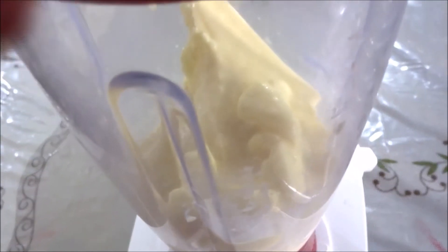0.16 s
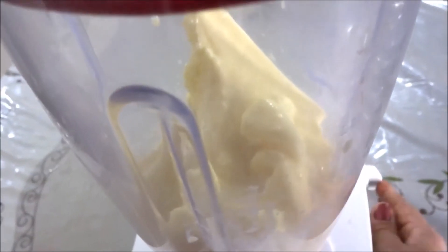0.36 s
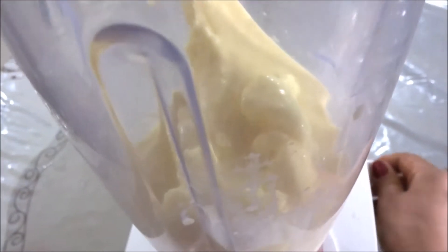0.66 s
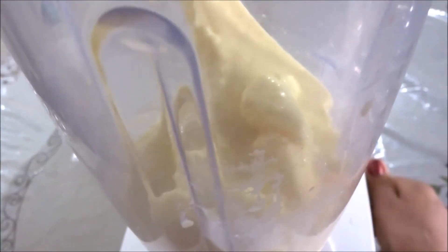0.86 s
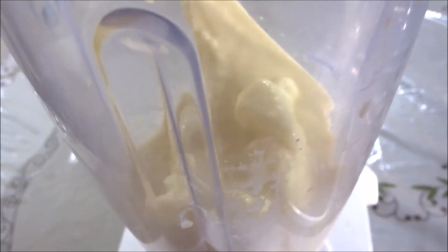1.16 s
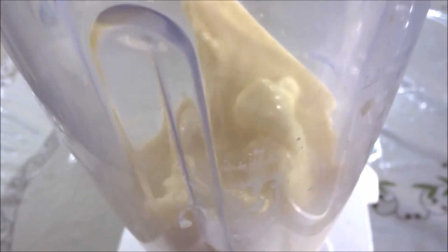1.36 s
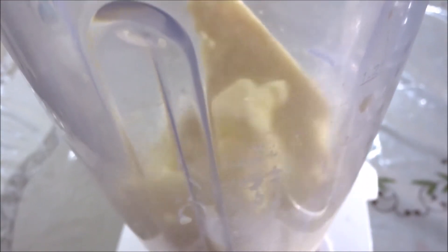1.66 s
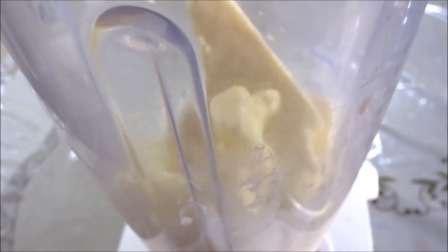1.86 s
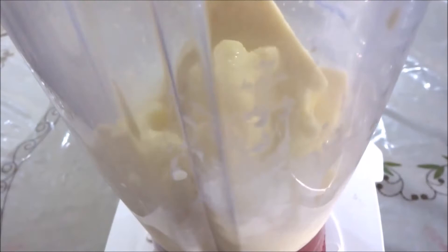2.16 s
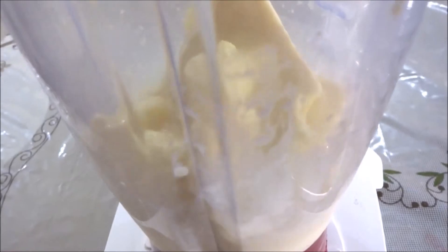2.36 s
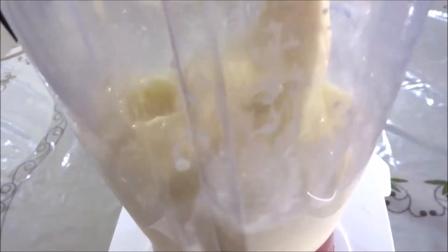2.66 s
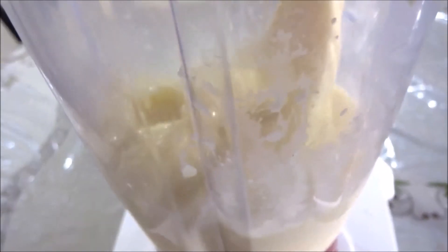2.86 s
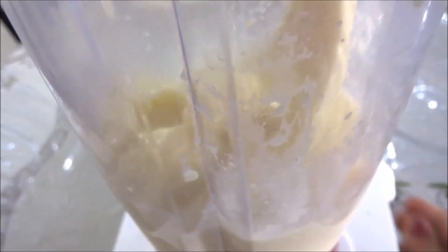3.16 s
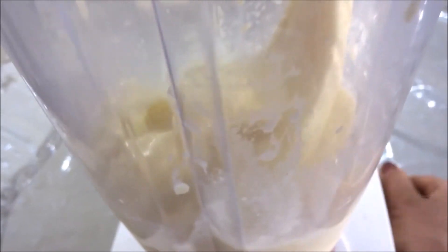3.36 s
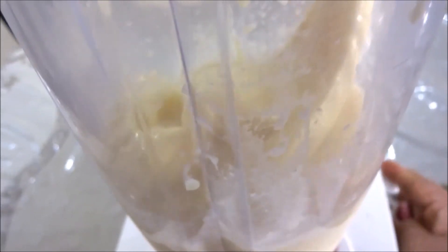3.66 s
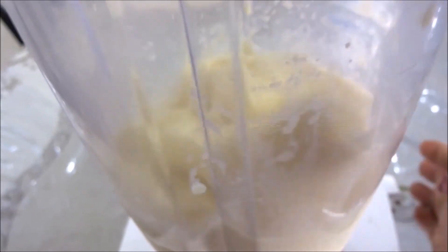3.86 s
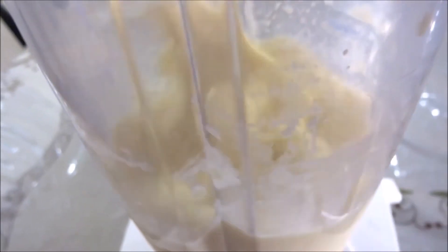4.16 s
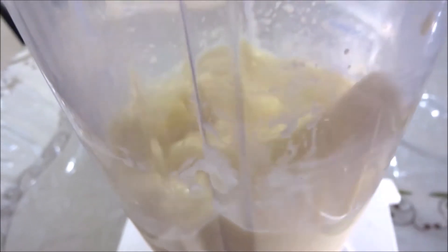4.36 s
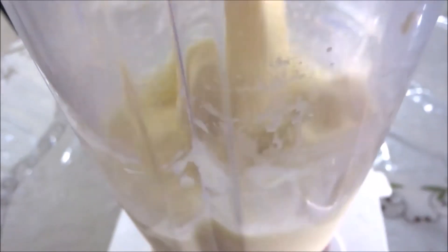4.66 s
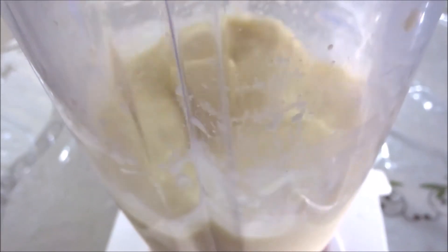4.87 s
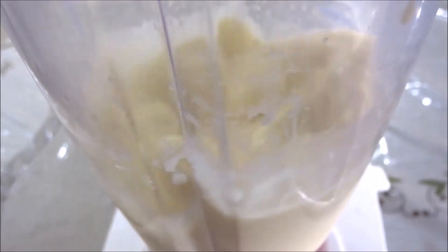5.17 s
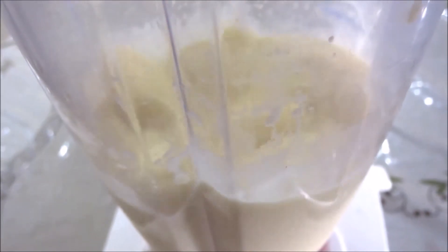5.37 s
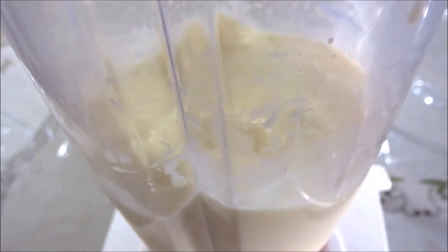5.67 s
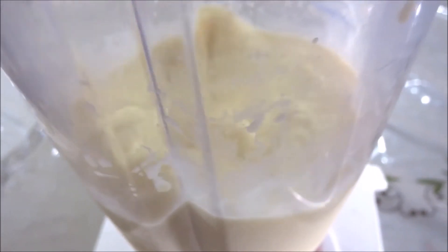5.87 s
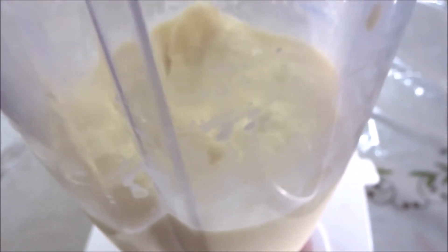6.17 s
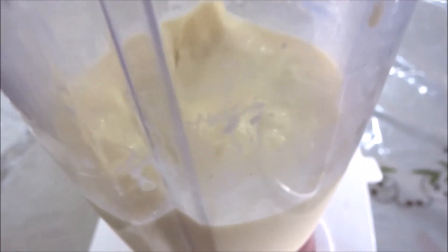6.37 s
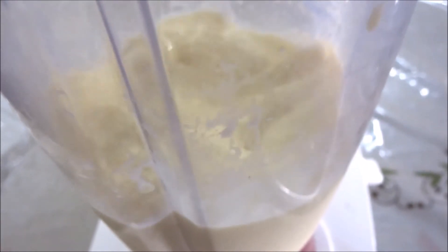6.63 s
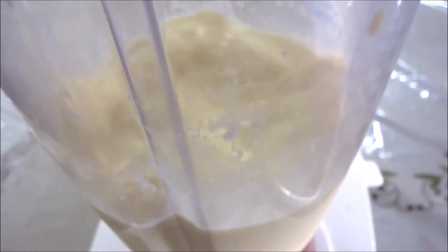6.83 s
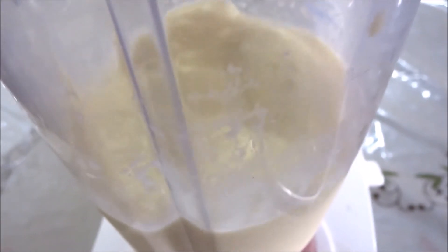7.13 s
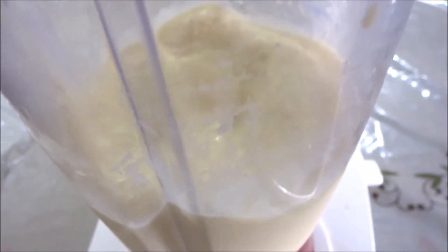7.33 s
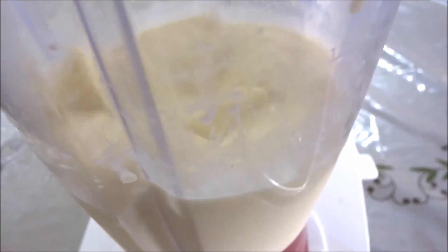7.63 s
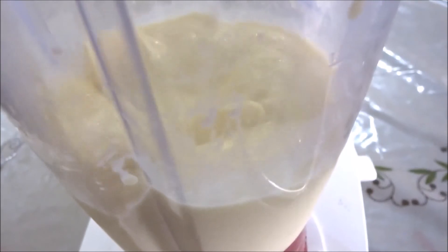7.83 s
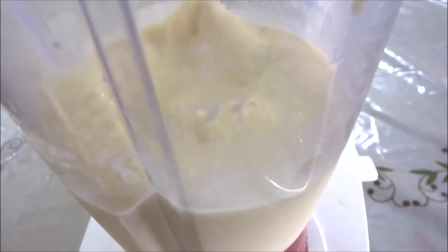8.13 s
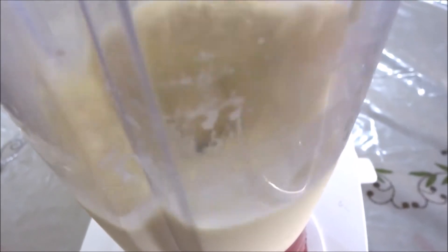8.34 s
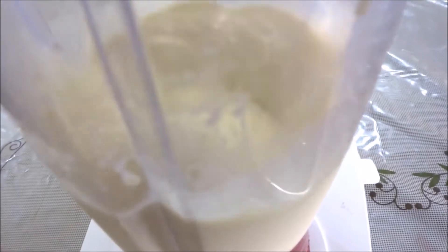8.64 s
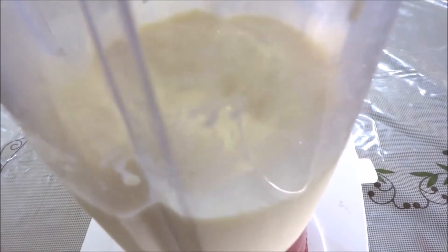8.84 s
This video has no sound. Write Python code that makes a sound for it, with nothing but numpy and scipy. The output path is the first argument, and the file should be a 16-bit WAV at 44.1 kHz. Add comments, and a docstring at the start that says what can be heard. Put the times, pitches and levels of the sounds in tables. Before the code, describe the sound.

A knob clicks and an electric blender starts up, whirring through a thick frozen mix, then steps up to a higher, wavering whine.

```python
"""A hand rubs over plastic, close by; a speed knob clicks, and a mixer grinder kicks in on a kitchen table.
It blends a frozen mix in a plastic jar and goes up a step at 3.5 s. The motor's whine sags whenever
the blades bite into a lump and swells where it meets a resonance. Around it, fan air rushes,
the brushes crackle, the coupler rattles the jar and the blades tear through icy grains."""
import sys
import numpy as np
from scipy import signal
from scipy.fft import rfft, irfft
from scipy.io import wavfile

SR = 44100
rng = np.random.default_rng(int(sys.argv[2]) if len(sys.argv) > 2 else 0)


def wav_record(signal):
    """Record a signal, one row per channel, as 16-bit PCM in the file named by sys.argv[1]."""
    frames = np.transpose(np.atleast_2d(signal))
    bounded = np.clip(frames, -1, 1)
    # unit amplitude maps onto the largest positive 16-bit level
    quanta = np.round(bounded * 32767).astype(np.int16)
    wavfile.write(sys.argv[1], SR, quanta)


N = 396900
T = np.arange(N) / SR
HZ = np.fft.rfftfreq(N, 1 / SR)

# the quiet kitchen's air: freq_hz, gain_db
ROOM_EQ = [(30, -39), (190, -30), (400, -16), (650, -9), (920, -4), (1300, 1), (1650, 8.5), (2500, 0),
           (4400, -2.5), (6400, -6), (9000, -8.5), (15500, -17)]
# its faint hum: pitch_hz, level_db
ROOM_HUM = [(576, -80), (662, -76.5), (1599, -87), (1981, -72)]
# strokes of a hand over plastic: start_s, length_s, rub_db, swish_db, release_s
STROKES = [(0, .1, -48, -41, 0.02), (0.115, 0.1, -50.5, -58, 0.0051), (0.248, 0.038, -68, -54.5, 0.14)]
# a stroke's dull rub: freq_hz, gain_db
RUB_EQ = [(24, -80), (40, -53), (167, -11), (231, -13), (432, -4), (795, -15), (870, -14), (1400, -15),
          (1820, -58), (3080, -120)]
# a stroke's dry swish: freq_hz, gain_db
SWISH_EQ = [(530, -45), (900, -26), (1950, -10), (2310, -13), (3420, -8), (9510, -11.5), (13100, -17),
            (15500, -28)]
# fingers brushing the knob: start_s, length_s, level_db
TOUCHES = [(0.452, .11, -52.5), (0.554, .05, -52), (.62, 0.043, -56)]
# knob clicks: start_s, level_db, ring_db
CLICKS = [(0.2524, -22.5, 2), (0.3017, -17.5, 2.5), (0.3050, -17.5, 2.5), (0.3100, -28, 11),
          (0.329, -43, 13), (0.4045, -42, -12), (0.425, -19.5, -29), (0.5138, -40, 3), (0.7483, -39, -2)]
# the plastic knob's ring: pitch_hz, level_db, t60_s
KNOB_MODES = [(3520, -3, .014), (3740, 5, 0.023), (4220, 1.5, 0.016), (4460, 2, 0.012), (4600, -3, 0.016),
              (6000, -2, 0.013), (6600, -4, .015), (7546, -7, .024), (11900, -15, .012)]
# the jar jolts on its coupler: start_s, level_db, decay_s
JOLTS = [(0.514, -52, 0.016), (0.649, -51, .01), (0.77, -36.5, 0.0044), (0.777, -42, 0.025),
         (0.859, -27.5, 0.077), (0.923, -33, 0.011)]
# ring of jar and coupler: pitch_hz, width_hz, low_step_db, high_step_db
JAR_MODES = [(1134, 32, 5, -1), (1197, 44, 3, -2), (1367, 145, -0.5, 3.5), (1574, 57, -4.5, -1.5)]
# jar rattle, easing as the mix loosens: time_s, level_db
RATTLE_LEVELS = [(0.96, -48), (2.0, -39.5), (2.6, -45.5), (3.0, -43), (3.4, -45), (3.7, -43), (5.0, -44),
                 (5.8, -49.5), (7.2, -46.5), (9.0, -45)]
# the whine the motor heads for between lumps: time_s, pitch_hz
MOTOR_PITCH = [(0.92, 638.7), (1.12, 660), (1.19, 632), (1.27, 652), (1.38, 599), (1.6, 580), (1.92, 680),
               (2.12, 665), (2.4, 615), (2.56, 592), (2.95, 622), (3.08, 598), (3.2, 630), (3.3, 598),
               (3.45, 601), (3.47, 788), (3.82, 766), (3.92, 845), (4.27, 767), (4.42, 822), (4.86, 748),
               (5.01, 880), (5.86, 912.6), (6.2, 908), (6.5, 912), (6.85, 903), (7.2, 882), (8.18, 877),
               (8.84, 892)]
# the blades bite into a lump: start_s, length_s, drag_share
BITES = [(1.686, 0.085, 0.201), (2.683, 0.04, 0.085), (3.812, 0.061, 0.134), (5.181, 0.1, 0.25),
         (5.377, 0.07, 0.28), (6.025, 0.07, 0.105), (6.324, 0.07, 0.055), (6.607, 0.095, 0.17),
         (6.953, 0.23, 0.1), (7.206, 0.139, 0.052), (7.441, 0.075, 0.22), (7.613, 0.074, 0.23),
         (8.317, 0.425, 0.124)]
# jar and base resonances that lift the whine or its octave: centre_hz, width_hz, lift_db
LIFTS = [(620, 100, 5), (899.6, 60, 14), (1161, 77, 7), (1208, 22, 3.5), (1300, 75, 4.5), (1570, 11.3, 7.5),
         (1790, 160, 4)]
# the jar howls along with the octave: start_s, length_s, lift_db
HOWLS = [(.95, 0.085, 7.5), (1.148, 0.23, 4.5), (1.34, 0.4, 9.5), (1.78, 0.052, 4), (1.92, 0.35, 0.5),
         (2.53, 0.18, 13.5), (2.755, 0.052, 6)]
# overtones on the low step: multiple, level_db, rough_share
LOW_OVERTONES = [(3, -58, 0.34), (4, -57, 0.45), (5, -65, 1), (12, -57, .8)]
# overtones on the high step, the top ones from commutator bars: multiple, level_db, rough_share
HIGH_OVERTONES = [(3, -61, .7), (6, -59, .9), (10, -60, .9), (12, -58, .8), (14, -56, .8), (15, -60, .8),
                  (16, -57.5, .8)]
# the housing whistles as an overtone sweeps by: multiple, centre_hz, width_hz, level_db, rough_share
WHISTLES = [(3, 1590, 130, -45, .15), (6, 3990, 150, -36.5, .3), (8, 4930, 200, -43.5, .8),
            (12, 10860, 200, -38, .7), (14, 11450, 500, -54, .8), (14, 12780, 350, -51, .85),
            (16, 13300, 800, -49.5, .8), (24, 14900, 1200, -46.5, 1)]
# the rush on the low step: freq_hz, gain_db
LOW_RUSH_EQ = [(30, -24), (130, -28), (400, -21), (740, -15), (960, -7.5), (1180, 3.5), (1850, -6),
               (2400, 1.5), (4100, 3), (5300, -1.5), (6200, -1), (7100, -3), (8300, 1), (10500, -4),
               (15500, -9.5)]
# the rush on the high step: freq_hz, gain_db
HIGH_RUSH_EQ = [(30, -47), (170, -34), (450, -24.5), (750, -14), (970, -9.5), (1130, -5), (1500, -0.5),
                (1950, -5.5), (2350, -2), (2800, 1.5), (3700, 2), (4150, 3), (4650, 3), (5500, -0.5),
                (7100, -1), (8200, 2.5), (8850, 0), (9500, 1), (10200, -3.5), (15500, -8)]
# bands of the rush that the flowing mix swallows in gulps: freq_hz, gain_db
GULP_EQ = [(1850, -43), (2020, 8), (2350, -5.5), (2750, -7), (3250, -17), (3600, -11), (3900, -4),
           (4300, -28)]
# blades shearing the mix: time_s, level_db
SHEAR_LEVELS = [(1.2, -42.5), (1.6, -52), (2.1, -68), (2.35, -42.5), (3.45, -41), (3.6, -38.5),
                (4.0, -38.5), (4.5, -35.5), (5.0, -37), (5.4, -36.5), (5.8, -38.5), (7.35, -39),
                (7.5, -35.5), (7.7, -39.5), (9.0, -39)]
# stereo spread of the reflections: freq_hz, side_gain_db
WIDTH_EQ = [(60, -33), (380, -76), (700, -23), (1300, -42.5), (2400, -14), (4400, -13.5), (8100, -16.5),
            (15000, -19.5)]

START_S, STEP_S, FLOW_S = 0.859, 3.5, 4.87  # motor starts, speed steps up, mix begins to flow
INERTIA_S = .073  # the rotor follows its drive and load with this lag


def amp(db):
    """Decibels to gain."""
    return 10 ** (np.asarray(db) / 20)


def unit(x):
    """Scales to rms 1."""
    return x / np.sqrt(np.mean(abs(x) ** 2) + 1e-20)


def curve(points):
    """An automation line through (time_s, value) points."""
    return np.interp(T, *np.transpose(points))


def fade_in(start_s, length_s):
    """Rises from 0 to 1 and holds."""
    return np.clip((T - start_s) / length_s, 0, 1)


def arch(start_s, length_s):
    """Swells from 0 to 1 and back."""
    return np.sin(np.pi * fade_in(start_s, length_s))


def lag(x, seconds):
    """Follows a curve sluggishly."""
    pole = np.exp(-1 / (seconds * SR))
    return signal.lfilter([1 - pole], [1, -pole], x)


def eq(x, points):
    """Shapes a sound with (freq_hz, gain_db) points."""
    hz, db = np.transpose(points)
    gain = amp(np.interp(np.log(HZ + 1), np.log(hz + 1), db))
    return irfft(rfft(x) * gain, N)


def noise():
    """White noise."""
    return rng.standard_normal(N)


def drift(rate_hz):
    """Random wandering of rms 1, rolled off above the given rate."""
    return unit(irfft(rfft(noise()) / (1 + (HZ / rate_hz) ** 4), N))


def impacts(per_s, spread_db):
    """Random tiny blows; with more spread, a few land much harder than the rest."""
    size = amp(spread_db * np.minimum(rng.exponential(1, N), 4))
    return unit(size * np.sign(noise()) * (rng.random(N) < per_s / SR))


def phasor(hz):
    """A complex oscillator that follows a pitch."""
    return np.exp(2j * np.pi * np.cumsum(hz * np.ones(N)) / SR)


def tone(turn, rough, blur_hz):
    """A phasor's tone, with the rough share of its power smeared into narrow noise."""
    blur = unit(drift(blur_hz) + 1j * drift(blur_hz))
    return unit((turn * (np.sqrt(1 - rough) + np.sqrt(rough) * blur)).real)


def resonate(x, hz, width_hz):
    """A steady or moving resonance with steep skirts; rms 1."""
    turn = phasor(hz)
    ring = x / turn
    for stage_hz in (width_hz, 3 * width_hz, 5 * width_hz):
        ring = lag(ring, 1 / (np.pi * stage_hz))
    return unit((ring * turn).real)


def nearness(hz, centre_hz, width_hz):
    """1 at the centre of a resonance, falling off to both sides."""
    return 1 / (1 + (2 * (hz - centre_hz) / width_hz) ** 2)


def hand():
    """Skin slides over plastic: a dull rub, a dry swish, one thin squeak and a light brushing."""
    rub = swish = 0
    for start, length, rub_db, swish_db, release in STROKES:
        stroke = fade_in(start, 0.0015) * np.exp(-np.maximum(T - start - length, 0) / release)
        rub += amp(rub_db) * stroke
        swish += amp(swish_db) * stroke
    rub *= unit(eq(noise(), RUB_EQ))
    swish *= unit(eq(noise() + .5 * impacts(per_s=920, spread_db=0), SWISH_EQ))
    grip = arch(0.062, .046)
    squeak_hz = 12200 * (1 + .075 * grip)
    squeak = amp(-40) * grip * tone(phasor(squeak_hz), rough=.3, blur_hz=150)
    touch = sum(amp(db) * arch(start, length) for start, length, db in TOUCHES)
    hiss = unit(eq(noise(), [(500, -29), (6000, -4), (13500, -2), (16000, -2), (18000, -30)]))
    return rub + swish + squeak + touch * hiss


def room_tone():
    """A bed of still air with a faint hum."""
    air = amp(-54.5) * unit(eq(noise(), ROOM_EQ))
    return air + sum(amp(db) * tone(phasor(hz), rough=0.3, blur_hz=7) for hz, db in ROOM_HUM)


def knob():
    """Each click is a sharp crack and a brief ring of the plastic knob, detuned by the grip."""
    t = T[:SR // 5]
    clicks = np.zeros(N)
    for start, db, ring_db in CLICKS:
        ring = 0
        for hz, mode_db, t60 in KNOB_MODES:
            gripped_hz = hz * (1 + .02 * rng.uniform(-1.1, 1))
            ring += amp(mode_db - 60 * t / t60) * np.sin(2 * np.pi * gripped_hz * t)
        snap = np.exp(-t / .0008)
        chatter = amp(ring_db - 15) * np.exp(-t / 0.012)
        crack = np.sign(rng.standard_normal(len(t))) * (snap + chatter)
        clicks[round(start * SR):][:len(t)] += amp(db) * (amp(-8.5) * crack + amp(ring_db - 16.5) * ring)
    return eq(clicks, [(200, -32), (1200, -8), (2700, -12), (3500, 2), (8000, 3.5), (15000, -1)])


def jar(high, sag):
    """The coupler jolts and rattles the jar, harder under load and hardest as the motor kicks in."""
    chatter = impacts(per_s=900, spread_db=4)
    ring = 0
    for hz, width, low_db, high_db in JAR_MODES:
        sloshed_hz = hz * (1 + .022 * high * drift(5))  # the sloshing mix detunes the jar
        ring += amp((1 - high) * low_db + high * high_db) * resonate(chatter, sloshed_hz, width)
    rattle_db = curve(RATTLE_LEVELS) + 11 * sag + 1.65 * drift(7.8)
    rattle = amp(rattle_db) * unit(ring) * fade_in(START_S, .003)
    jolts = sum(amp(db) * fade_in(start, 0.0013) * np.exp(-abs(T - start) / decay)
                for start, db, decay in JOLTS)
    body = eq(noise(), [(200, -36), (750, -19), (1100, 0), (1350, 4), (1700, 1),
                        (2200, -25), (4000, -16), (15000, -52)])
    return rattle + jolts * unit(body)


def rotor(high):
    """The whine's pitch, and its sag: the share of speed lost as big lumps brake the rotor."""
    onset_hz = 200  # the pitch from which the whine rises at switch-on
    drag = sum(share * ((T >= start) & (T < start + length)) for start, length, share in BITES)
    drive_hz = (curve(MOTOR_PITCH) * (1 - drag) - onset_hz) * (T >= START_S)
    hz = onset_hz + lag(drive_hz, INERTIA_S)
    small_lumps = rng.random(N) < 13 / SR  # about 13 a second, each briefly checking the rotor
    jogs = .0075 * unit(lag(lag(small_lumps - small_lumps.mean(), .01), INERTIA_S))
    return hz * (1 - .5 * (1 + high) * jogs), lag(drag, INERTIA_S)


def whine(turn, hz, high):
    """The rotor's tone and overtones, swelling at resonances and smeared by uneven running."""
    lift_db = sum(db * nearness(hz, centre, width) for centre, width, db in LIFTS)
    flutter_db = 2 * high * drift(16)  # the sloshing mix covers and bares the blades
    fundamental = amp(-56 + lift_db + flutter_db) * tone(turn, rough=0.11, blur_hz=25.8)
    howl_db = sum(db * np.sqrt(abs(arch(start, length))) for start, length, db in HOWLS)
    low_octave = amp(-51 + howl_db + 2 * drift(16)) * tone(turn ** 2, rough=0.06, blur_hz=25)
    high_octave = amp(-50) * tone(turn ** 2, rough=0.5, blur_hz=50)
    octave_lift_db = sum(db * nearness(2 * hz, centre, width) for centre, width, db in LIFTS)
    overtones = amp(octave_lift_db) * ((1 - high) * low_octave + high * high_octave)
    pickup = np.clip(np.gradient(hz) * SR / 350, -1, 1)  # -1 braking, 1 speeding up by 350 Hz a second
    pickup_db = ((1 - high) * 8.5 + high * 4.5) * pickup  # overtones sing out as the rotor gains speed
    for share, partials in ((1 - high, LOW_OVERTONES), (high, HIGH_OVERTONES)):
        for multiple, db, rough in partials:
            gain = share * amp(db + pickup_db + 2.5 * drift(8.5))
            overtones += gain * tone(turn ** multiple, rough, blur_hz=8 * multiple)
    choke_db = 11 * high * np.minimum(pickup, 0)  # braking ducks the housing whistles
    for multiple, centre, width, db, rough in WHISTLES:
        gain = amp(db + choke_db) * nearness(multiple * hz, centre, width)
        overtones += gain * tone(turn ** multiple, rough, blur_hz=6.5 * multiple)
    return fundamental * fade_in(START_S, 0.057) + overtones * fade_in(START_S + 0.055, 0.038)


def rush(turn, hz, high):
    """Fan air and brush crackle pulse with the rotor; once the mix flows, it gulps at their mids."""
    hiss = noise() + amp(-2.5) * impacts(per_s=5000, spread_db=2)
    pulse = 1 + 0.3 * (1 - 2 * high) * turn.real
    hiss *= pulse * amp(0.57 * drift(320))
    air = (1 - high) * unit(eq(hiss, LOW_RUSH_EQ)) + high * unit(eq(hiss, HIGH_RUSH_EQ))
    spinning_free = np.clip((hz - 833) / 70, 0, 1)  # the blades come free above 833 Hz
    gulps = fade_in(FLOW_S, 0.68) * np.clip(0.33 + 0.45 * spinning_free + 0.42 * drift(22), 0, 1)
    air -= gulps * eq(air, GULP_EQ)
    level_db = -31 + 0.52 * drift(80) + 0.5 * drift(10.7)
    return air * amp(level_db) * np.sqrt(fade_in(START_S, 0.03))


def shear(sag):
    """Blades tear through icy grains; the hollow they dig rings near 3 kHz, louder and lower in a lump."""
    level_db = curve(SHEAR_LEVELS) + 7 * sag + .7 * drift(12)
    grains = impacts(per_s=2500, spread_db=2) * amp(1.7 * drift(50))
    hollow_hz = 2987 * (1 - 0.49 * sag) * (1 + .024 * drift(30))
    hollow = amp(level_db) * resonate(grains, hollow_hz, width_hz=370) * fade_in(START_S, 0.02)
    air_pocket = amp(-46) * resonate(grains, hz=1787, width_hz=210) * fade_in(FLOW_S, .9)
    return hollow + air_pocket


def rumble(high):
    """The shaking base drums faintly on the table, more so on the high step."""
    thrum = unit(eq(noise(), [(25, -1), (120, 1), (260, 0), (400, -1), (700, -28), (3000, -70)]))
    return amp(-80.5 + 2.5 * high + 2 * drift(5.1)) * thrum * fade_in(START_S, .01)


def sparks():
    """The brushes rasp while the motor draws its starting current."""
    surge = fade_in(START_S + 0.025, 0.044) * (1 - fade_in(1.15, 0.38))
    return amp(-42) * surge * resonate(impacts(per_s=4000, spread_db=5), hz=5940, width_hz=660)


def echoes(x, t60_s):
    """Dense, quickly dying reflections from table and walls."""
    t = T[:SR // 2]
    taps = np.sign(rng.standard_normal(len(t))) * (rng.random(len(t)) < 5000 / SR) * (t > .002)
    taps *= amp(-60 * t / t60_s) + 3 * np.exp(-t / 0.0034)  # tail plus strong early reflections
    return signal.fftconvolve(x, taps / np.linalg.norm(taps))[:N]


def shifting_echoes(x, t60_s):
    """Two sets of room reflections, crossfaded about once a second so that no pitch rings."""
    sway = 2 * np.pi * T + drift(4)
    return np.cos(sway) * echoes(x, t60_s) + np.sin(sway) * echoes(x, t60_s)


def scene():
    """Hand and machine sit in the centre, and a small kitchen's reflections spread them in stereo."""
    high = fade_in(STEP_S - .04, 0.077)  # 0 on the low step, 1 on the high
    hz, sag = rotor(high)
    turn = phasor(hz)
    ambience = hand() + room_tone()
    noises = rush(turn, hz, high) + jar(high, sag) + shear(sag) + sparks() + rumble(high)
    noises += knob() + ambience
    mid = whine(turn, hz, high) + noises + amp(-9.5) * shifting_echoes(noises, t60_s=0.24)
    side = eq(echoes(mid, t60_s=0.33), WIDTH_EQ) + amp(-15) * echoes(ambience, t60_s=0.31)
    return np.array([mid + side, mid - side])


def record(dry):
    """A steep high cut takes off the very top."""
    cutoff_hz = 15850
    high_cut = signal.firwin(801, cutoff_hz, window=("kaiser", 9), fs=SR)
    return signal.oaconvolve(dry, high_cut[None], "same")


dry = scene()
out = record(dry)
wav_record(out)
```